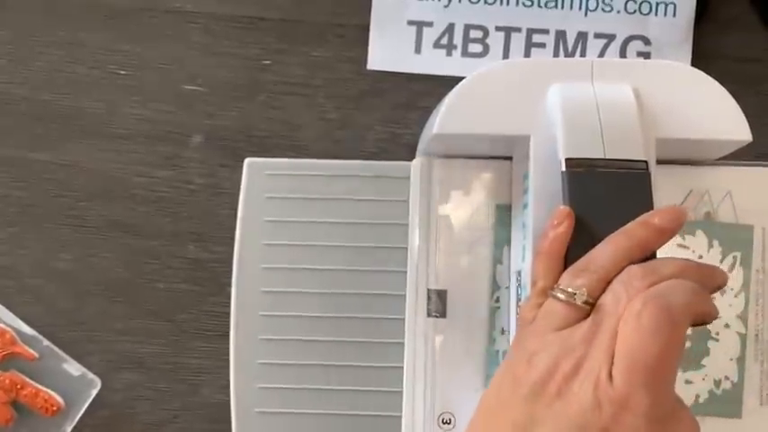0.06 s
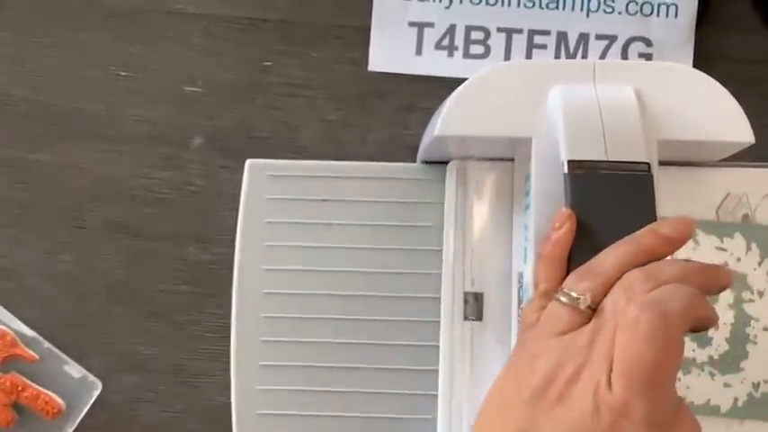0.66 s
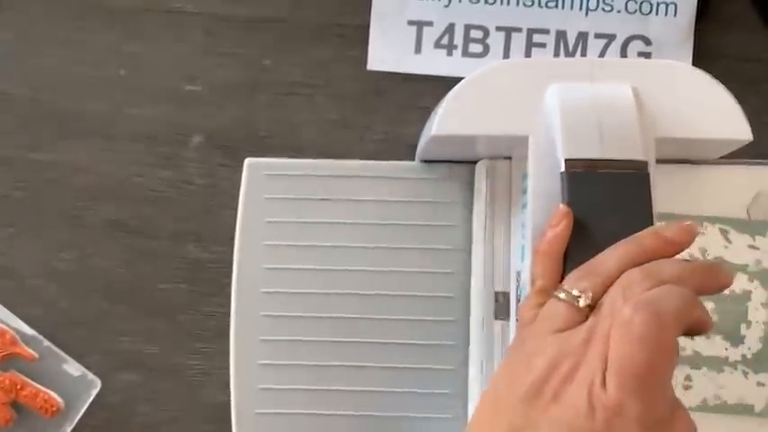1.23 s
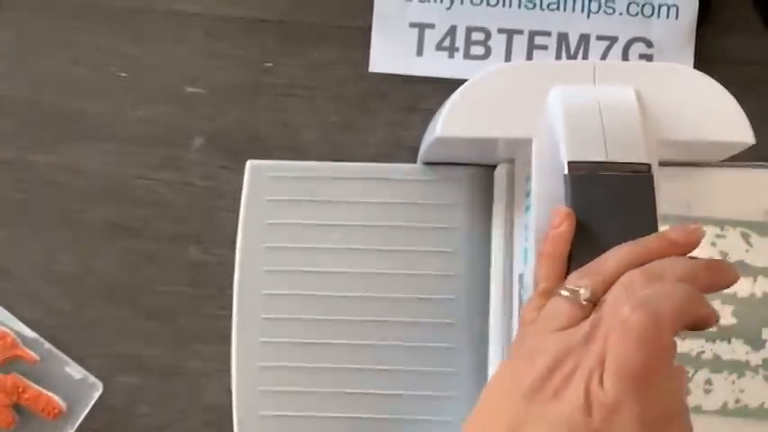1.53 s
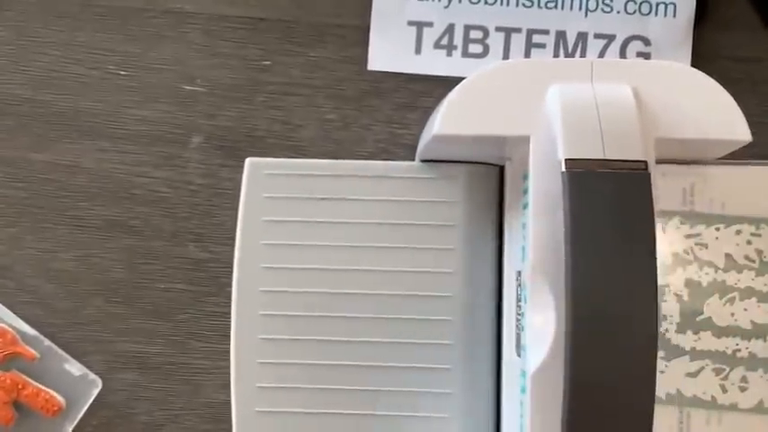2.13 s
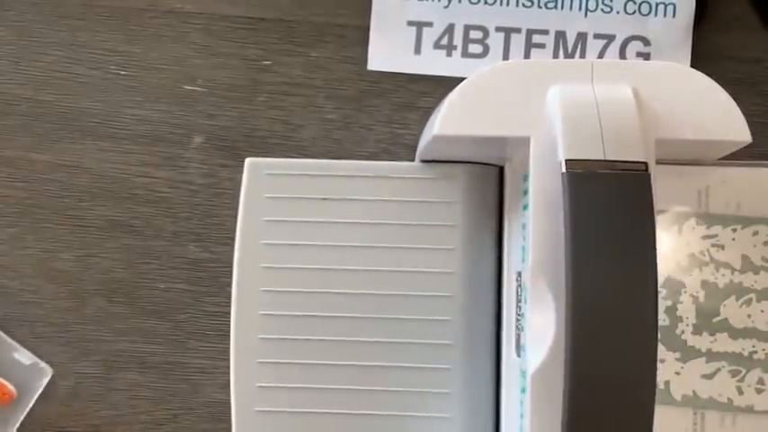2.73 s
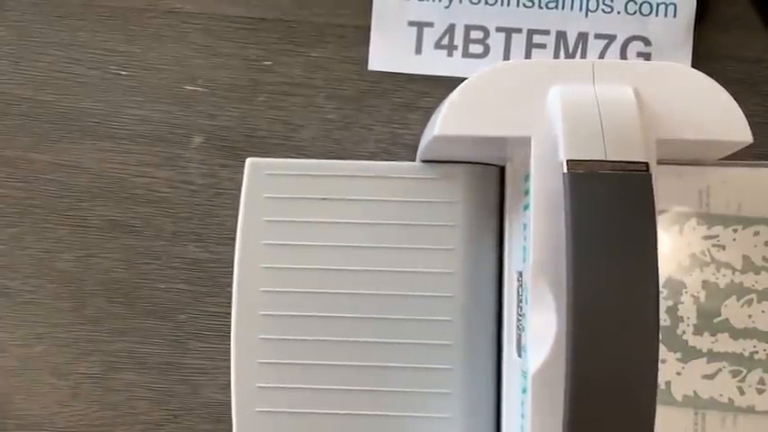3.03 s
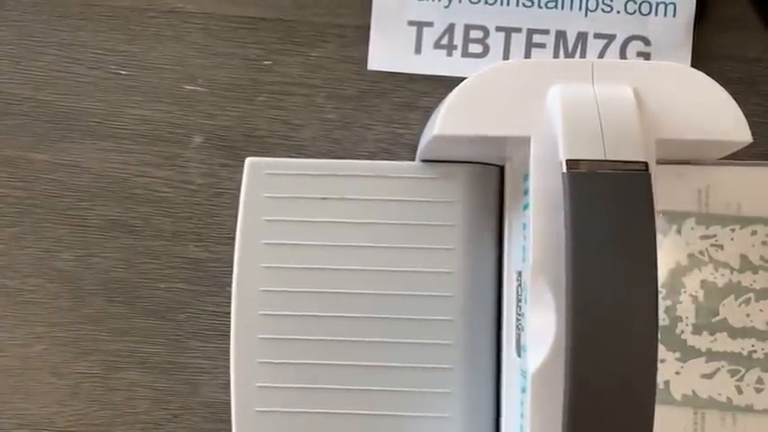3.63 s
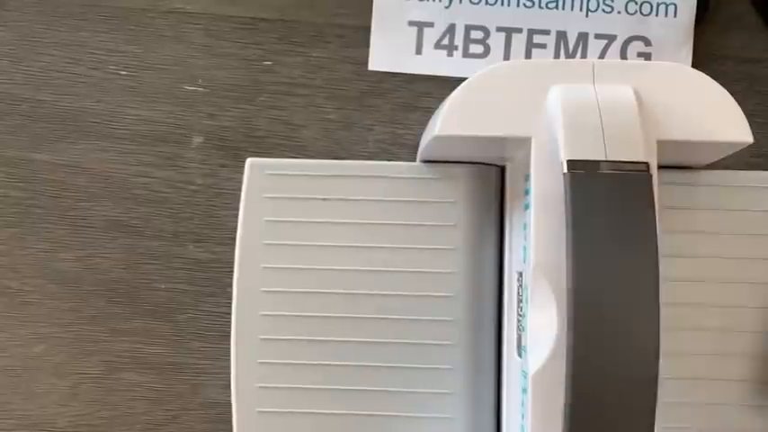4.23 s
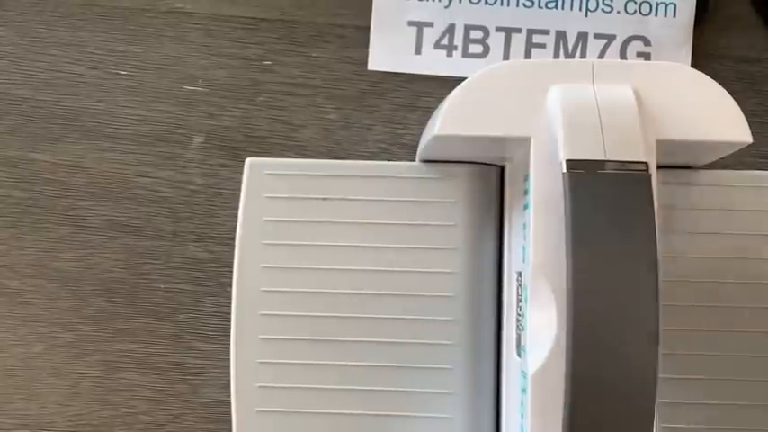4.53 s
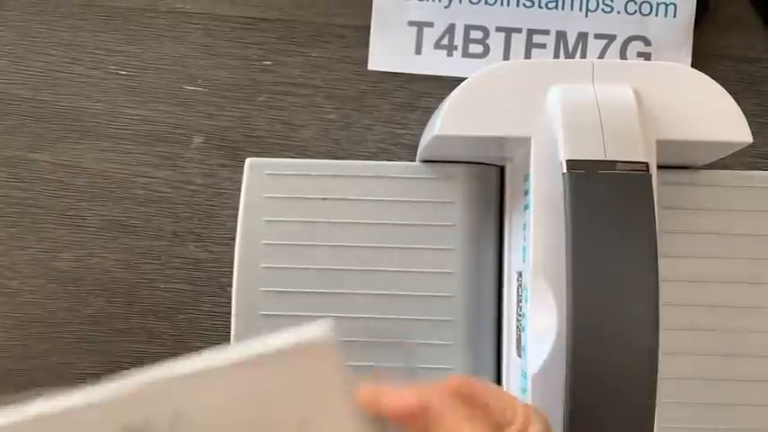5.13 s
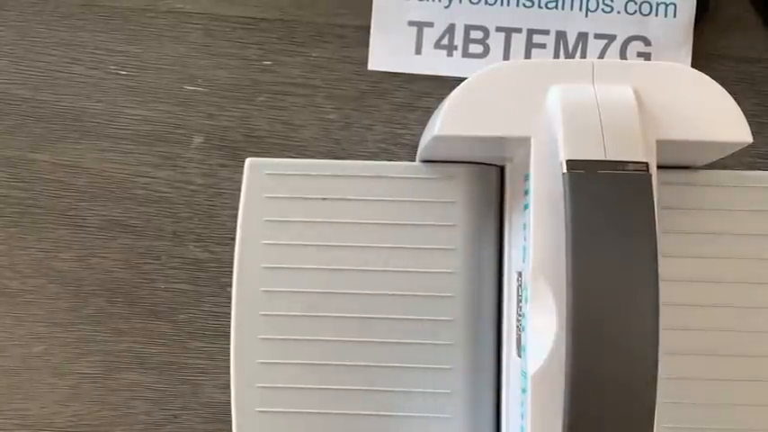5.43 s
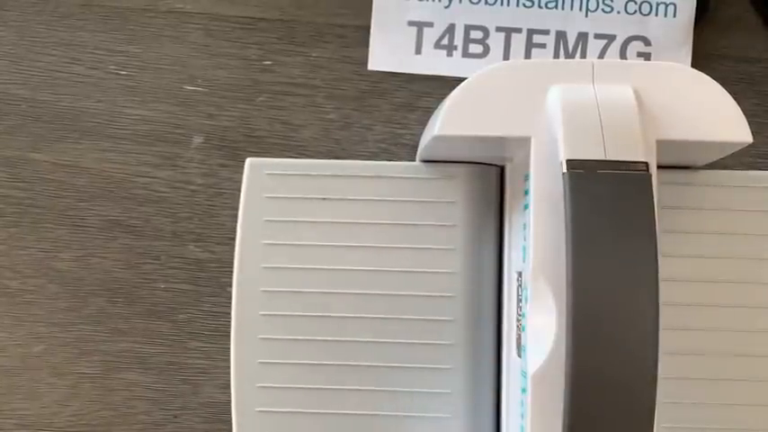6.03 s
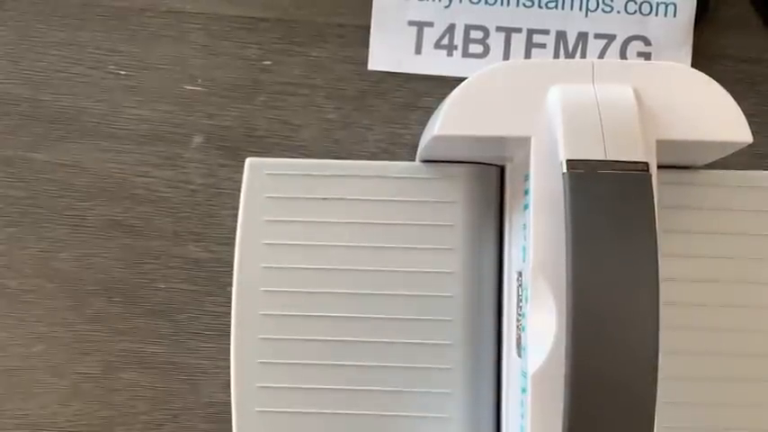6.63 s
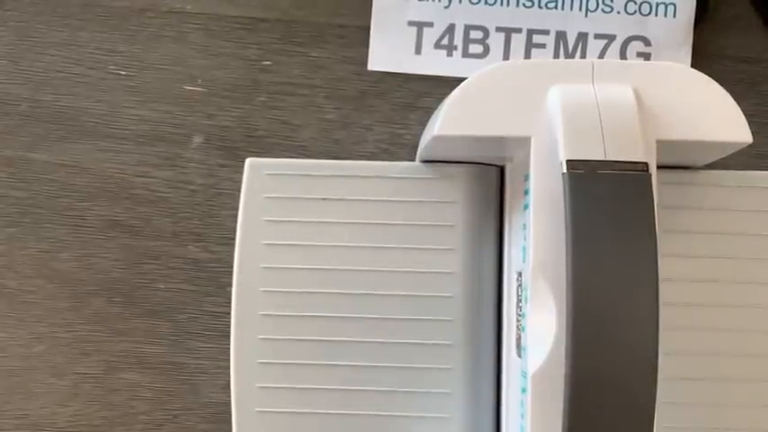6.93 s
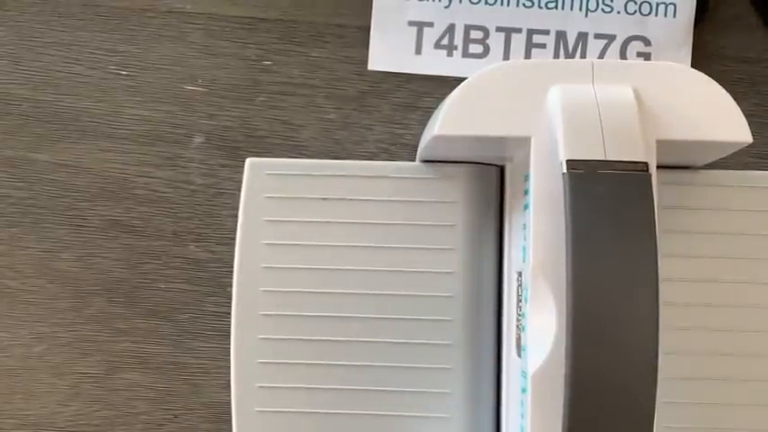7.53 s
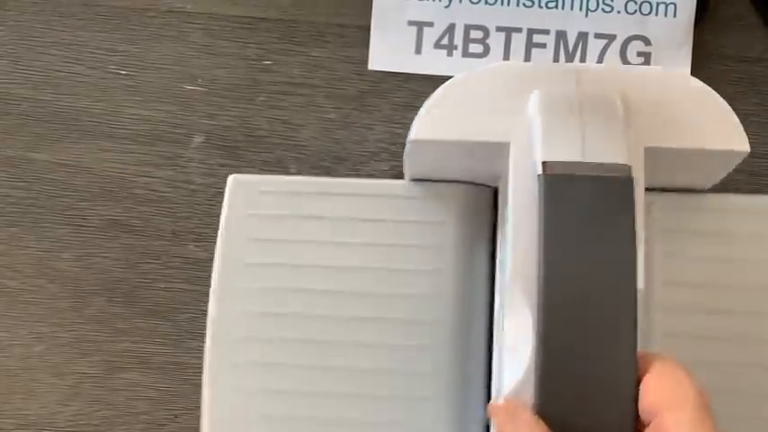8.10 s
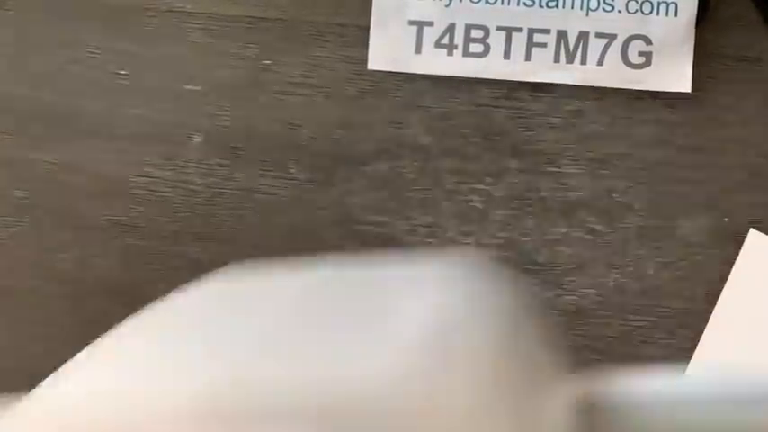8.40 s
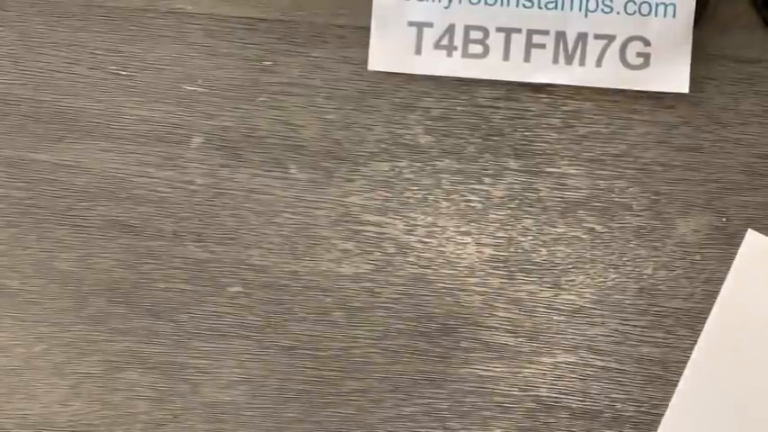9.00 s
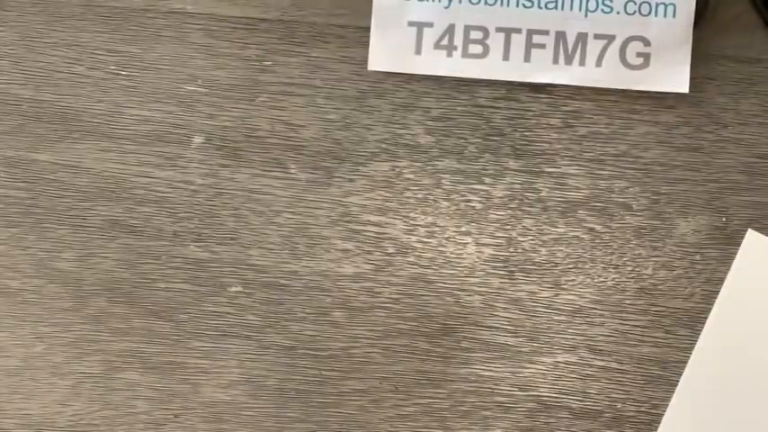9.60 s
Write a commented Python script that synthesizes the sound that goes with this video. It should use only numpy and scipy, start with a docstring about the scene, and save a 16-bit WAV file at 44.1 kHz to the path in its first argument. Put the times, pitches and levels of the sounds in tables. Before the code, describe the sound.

A hand-cranked die-cutting machine rumbles and snaps, then plastic plates clack, rub and squeak before the machine is dragged aside.

```python
"""A craft table in a small room, close to a hand-cranked die-cutting machine.
The rollers rumble and the squeezed plastic plates snap; the die crunches through the card, and the
plates spring free with a thump and are wound back through. They are lifted out, rubbed together and
laid down with clacks and squeaks, then the machine is dragged aside. Hits are noise bursts ringing
in the struck part; rumbles, rubs and drags are stick-slip grains coloured by the part that moves."""
import sys
import numpy as np
from scipy import signal
from scipy.io import wavfile

SR = 44100
rng = np.random.default_rng(int(sys.argv[2]) if len(sys.argv) > 2 else 0)


def wrap_up_sound(samples):
    """Save the sound to the file named by the first command line argument, as 16-bit audio."""
    columns = np.atleast_2d(samples).T
    # keep every value between -1 and 1, then stretch to whole-number steps
    tamed = np.clip(columns, -1, 1)
    steps = np.round(tamed * 32767).astype(np.int16)
    wavfile.write(sys.argv[1], SR, steps)


N = 434826
BAND_LIMIT_HZ = 15950

# Tone curves: frequency_hz, gain_db
AIR_TONE = [(18, -46), (60, -3), (120, -1.5), (237, -15), (332, -11), (620, -16), (2070, -25), (7080, -29),
            (15500, -38.5)]  # the quiet room
ROLLER_TONE = [(20, -31.5), (45, -4.5), (155, 2), (290, -7.5), (360, -1.5), (480, -10), (950, -11),
               (1450, -20.5), (2200, -34.5), (9000, -62.5)]  # rumble of gears and rollers
DRAG_TONE = [(35, -30), (70, -10), (130, -5), (220, -9), (340, -5), (500, -7), (900, -1), (1800, -15),
             (4500, -20), (14000, -53)]  # hard plastic pushed along
RUB_TONE = [(100, -13), (400, -5), (750, -7), (1130, -2), (1500, -4), (2100, -5), (3200, -11), (5000, -17),
            (9000, -36)]  # hollow middle of a rubbed plate
HISS_TONE = [(500, -34), (1800, -12), (3300, -1), (7000, -1), (9500, -10), (15500, -17)]  # gritty top of the same rub
TAP_TONE = [(50, -26), (120, -12), (220, -9), (450, -13), (1150, -4), (2300, -8), (3500, -12), (5500, -14),
            (11000, -30), (15500, -34)]  # plate on plate
THUMP_TONE = [(40, -17), (90, -6), (170, -2), (300, -4), (1000, -3), (1700, -12), (3000, -20), (4500, -23),
              (7000, -31), (10000, -44), (15500, -56)]  # body, crank and table
CRACK_TONE = [(60, -24), (200, -7), (400, -10), (660, -1), (1400, -8), (2400, -3), (3600, -5), (5200, -11),
              (7100, -6), (9600, -7), (15500, -14)]  # plates and die under pressure

# Resonances: pitch_hz, width_hz, lift_db
PLATE_MODES = [(775, 35, 5), (1060, 55, 7), (1240, 55, 6), (2112, 80, 6), (3350, 120, 5), (3820, 90, 4)]  # a loose plate
BODY_MODES = [(160, 26, 5), (218, 40, 5), (394, 30, 7), (465, 30, 4), (1296, 50, 4)]  # the machine's body
DIE_MODES = [(760, 300, 5), (2420, 450, 5.5), (4050, 400, 6), (9720, 560, 9)]  # the thin metal die
SQUEEZED_MODES = [(662, 160, 3), (2410, 300, 3), (7150, 350, 4)]  # plates clamped between the rollers

# The crank turning the rollers, in and then back: start_s, length_s, level_db
CRANK_TURNS = [(0, 1.73, -58), (1.76, 1.025, -59), (2.76, 0.65, -61.5)]
# Plates pushed over the tray, the machine over the table:
# start_s, length_s, level_db, bass_db, tilt_db_per_octave
PUSHES = [(3.497, 0.18, -46.5, 13, -2.5), (3.747, 0.4, -42, 3, -2), (4.19, 0.23, -58.5, 6, -8.5),
          (8.045, 0.11, -59.5, 16, 7), (8.937, 0.14, -63, 1.5, 2), (9.107, 0.26, -59.5, 4.5, -5.5),
          (9.601, 0.18, -56.5, 5, -1.5)]
# A plate or a hand stroking plastic: start_s, length_s, ring_db, hiss_db, hiss_top_hz
STROKES = [(2.628, 0.055, -48, -67, 7700), (2.748, 0.62, -61.5, -72, 7440), (3.088, 0.12, -52, -63, 7500),
           (3.937, 0.029, -37, -44.5, 6140), (4.545, 0.13, -59.5, -76.5, 7400),
           (4.678, 0.077, -50, -57.5, 14200), (4.983, 0.13, -55.5, -70, 15800),
           (5.155, 0.24, -66, -78, 15000), (5.323, 0.06, -54, -66, 15500),
           (5.428, 0.037, -57, -55.5, 15800), (5.494, 0.19, -54, -58, 15600),
           (5.567, 0.069, -65, -46, 15800), (6.341, 0.037, -61, -53.5, 15800),
           (6.511, 0.039, -50.5, -59.5, 10700), (6.55, 0.078, -42, -73, 14200),
           (6.922, 0.23, -61, -70.5, 8200), (7.204, 0.056, -90, -57.5, 9100),
           (7.294, 0.037, -66, -53, 15000), (7.372, 0.12, -81.5, -65.5, 8900),
           (8.034, 0.083, -58.5, -61.5, 9000), (8.576, 0.08, -72, -75, 8300),
           (9.247, 0.069, -61.5, -63, 5740), (9.686, 0.023, -70, -57, 7450)]
# A plate's edge or the machine's foot catching: start_s, length_s, level_db, pitch_hz, width_hz
SCRAPES = [(1.775, 0.053, -59.5, 1240, 604), (1.946, 0.088, -58.5, 380, 348),
           (2.677, 0.092, -55.5, 1630, 603), (2.853, 0.087, -57, 690, 700), (3.306, 0.055, -66, 1160, 900),
           (4.867, 0.2, -64, 1020, 220), (5.082, 0.0071, -41.5, 1126, 260), (6.53, 0.053, -50.5, 1020, 110),
           (7.073, 0.096, -61.5, 1080, 132), (7.71, 0.023, -42.5, 1077, 170),
           (9.011, 0.12, -57.5, 700, 590), (9.66, 0.1, -55, 333, 90)]
# Plate edges squeaking: start_s, pitch_hz, peak_db
SQUEAKS = [(6.279, 4800, -53), (7.298, 5320, -43), (7.693, 2300, -53.5), (7.796, 4840, -57)]
# The die biting through the card just before the plates spring free: start_s, length_s, level_db
DIE_BITE = [(1.193, 0.11, -36.5)]

# Hits: start_s, level_db, bass_db, tilt_db_per_octave, reverb_trim_db, top_hz
TAPS = [(4.267, -60.5, 5, -1, 1, 2830), (4.691, -41.5, 10, -4, -7, 15000),
        (4.753, -55, 18, 1.5, -10, 14000), (4.854, -52.5, 10, 0, -10, 2500),
        (4.956, -64, 12.5, -4, -3, 3530), (5.085, -60.5, -2, 0, -14, 16000),
        (5.322, -53.5, 6, 1, -9, 16000), (5.394, -54.5, 4, -0.5, 1, 16000),
        (5.591, -38.5, -1, -21.5, -2.5, 16000), (5.782, -36, 7.5, -6.5, 12, 5500),
        (6.721, -49, 3, -2.5, -7, 4650), (6.785, -34.5, -1.5, 2, -3, 9900), (6.947, -63, 7, 9.5, -4, 14000),
        (7.037, -70, 22.5, 7, -10, 6560), (7.174, -65, -2, 3, 0, 6520), (7.242, -59, -10, 5.5, -13, 7900),
        (7.405, -67, -14, 8, -7.5, 7500), (7.856, -50.5, -2, 0, 3, 8100)]  # loose plates striking each other
THUMPS = [(1.349, -26.5, 7.5, 5, -8, 16000), (1.502, -47, 5.5, 2.5, -13, 11000),
          (1.548, -52, 8, -0.5, 1, 8970), (2.328, -45, 9, 0, -12, 2200), (2.382, -47, 1.5, 5, 11, 10700),
          (2.642, -57, -3, 10, -1, 7500), (3.163, -53.5, -6, -9, -30, 7500),
          (3.594, -38.5, -5.5, 1, -15, 7240), (3.708, -54, 8, -2, -5, 7000),
          (3.783, -39, -5, -3, -14.5, 7000), (3.829, -39, -8, -3.5, -17, 8000),
          (3.932, -41, -31, 3, -15, 15000), (4.193, -56, 3, 0.5, -3, 6980), (5.785, -35.5, 2, -3, -7, 7500),
          (6.01, -61, 6, 6.5, 9, 4060), (6.214, -43, 2, -1.5, -5.5, 8000), (6.3, -38.5, 4.5, 1.5, 1, 15000),
          (7.712, -45, -9.5, 4, -2.5, 16000), (8.485, -70.5, -11, -10.5, -15, 1990),
          (8.656, -65.5, -2, 5.5, -11, 6000), (9.021, -56.5, -19, -2.5, -21, 5000),
          (9.273, -52.5, -20.5, -6, -11, 6000), (9.694, -50.5, 0, 5.5, 12, 7350),
          (9.782, -51, -9, 1.5, 6, 6900)]  # dull knocks of body, crank and table
CRACKS = [(0.132, -57, 1, -4, 5, 7100), (0.359, -37, -4, 0.5, -4, 15900), (0.504, -53.5, 9, -6, -5, 6400),
          (0.593, -52.5, 7, -11.5, 0, 4500), (0.789, -55.5, 1, -2, 5, 7100),
          (0.926, -53, 4, -0.5, -0.5, 9470), (1.048, -45.5, 7, 0, -3, 16000),
          (1.191, -39.5, 3, 3, -2.5, 16000), (1.2355, -29, 1.5, 1.96, -7, 16000),
          (1.2695, -32.5, 2.5, 2, -7.5, 16460), (1.35, -31.5, -1, -1, 1.5, 15800),
          (1.649, -53, -22, -2, 21, 7400)]  # plates and die snapping under the rollers


def amp(db):
    """Decibels to gain."""
    return 10 ** (np.asarray(db) / 20)


def unit_rms(x):
    """Scales to an rms of one."""
    return x / np.sqrt(np.mean(x ** 2) + 1e-20)


def curve_at(points, hz):
    """Reads a curve on a log-frequency axis."""
    point_hz, value = np.transpose(points)
    return np.interp(np.log(hz + 1), np.log(point_hz + 1), value)


def add(mix, start_s, sound):
    """Lays a sound into the mix at start_s."""
    part = mix[max(round(start_s * SR), 0):][:len(sound)]
    part += sound[:len(part)]


def equalise(x, tone, modes=(), bass_db=0, tilt_db=0, top_hz=SR):
    """Minimum-phase EQ: tone curve, resonances, bass shelf, treble tilt and a drop above top_hz."""
    hz = abs(np.fft.fftfreq(8192, 1 / SR))
    db = curve_at(tone, hz)
    db += sum(lift / (1 + (2 * (hz - pitch) / width) ** 2) for pitch, width, lift in modes)
    db += bass_db * curve_at([(250, 1), (700, 0)], hz)
    db += tilt_db * np.log2(np.clip(hz / 1500, 1, 6))
    db += curve_at([(top_hz, 0), (1.35 * top_hz, -15)], hz)
    log_spectrum = signal.hilbert(np.log(amp(db))).conj()
    kernel = np.fft.ifft(np.exp(log_spectrum)).real
    return signal.fftconvolve(x, kernel[:len(kernel) // 2])[:len(x)]


def room_tail(samples):
    """Diffuse reflections of the small room, each band dying away at its own speed."""
    hz, time_s, bands = signal.stft(rng.standard_normal(samples), SR, nperseg=256)
    t60_s = curve_at([(180, 0.22), (900, 0.25), (7000, 0.24)], hz)
    return signal.istft(bands * amp(-60 * time_s / t60_s[:, None]), SR, nperseg=256)[1][:samples]


def gesture(length_s, attack_s, release_s, arch_db):
    """Envelope of one hand movement: it gets going, presses hardest midway and dies away."""
    t = np.arange(round((length_s + 8 * release_s) * SR)) / SR
    off_centre = (2 * np.minimum(t / length_s, 1) - 1) ** 2
    release = np.exp(-np.maximum(t - length_s, 0) / release_s)
    return amp(-arch_db * off_centre) * np.minimum(t / attack_s, 1) * release


def gestures(rows, attack_s, release_s, arch_db):
    """Envelope of a series of like movements."""
    envelope = np.zeros(N)
    for start_s, length_s, level_db in rows:
        add(envelope, start_s, amp(level_db) * gesture(length_s, attack_s, release_s, arch_db))
    return envelope


def friction(grains_per_s, spread_db, smooth, wet_db, waver_db):
    """Tiny slips of uneven size over a smooth rub, under wavering pressure, heard in the room."""
    sizes = amp(spread_db * np.minimum(rng.exponential(1, N), 4))
    slips = sizes * rng.standard_normal(N) * (rng.random(N) < grains_per_s / SR)
    knots = np.arange(0, N, SR // 25)
    pressure = amp(waver_db * np.interp(np.arange(N), knots, rng.standard_normal(len(knots))))
    rub = (unit_rms(slips) + smooth * rng.standard_normal(N)) * pressure
    tail = room_tail(SR // 2)
    return rub + amp(wet_db) * signal.fftconvolve(rub, tail / np.linalg.norm(tail))[:N]


def sheet_modes(stroke_s, lift_db, lowest_hz=450, count=36):
    """Narrow peaks and dips of thin plastic, new with each grip; a long stroke damps them."""
    freedom = np.exp(-stroke_s / 0.8)
    pitches = lowest_hz * 10 ** ((np.arange(count) + rng.random(count)) / count)
    return [(hz, 24 + hz / 100, lift_db * freedom * rng.uniform(-1, 1)) for hz in pitches]


def glide_down(x, fall_per_s=0.5):
    """Resonances sink as the free end of a sliding plate grows longer."""
    n = np.arange(len(x))
    speed = np.exp(-fall_per_s * (n - len(x) / 4) / SR)
    return np.interp(np.cumsum(speed), n, x)


def resonate(x, centre_hz, width_hz):
    """A steep resonance swept along the curve centre_hz."""
    carrier = np.exp(2j * np.pi * np.cumsum(centre_hz) / SR)
    pole = np.exp(-np.pi * width_hz / SR)
    return (carrier * signal.lfilter([(1 - pole) ** 2], [1, -2 * pole, pole * pole], x / carrier)).real


def hits(rows, tone, modes, rise_s, decay_s, wet_db, echo_db, brush_db, sheet_db=0, detune=0):
    """A brush, a chattering contact, its slap off the table and a room tail ring the struck part."""
    out, t = np.zeros(N), np.arange(SR * 3 // 5) / SR
    impulse = 1.0 * (t == 0)
    tone_gain = np.linalg.norm(equalise(impulse, tone))
    lead_in = t[:SR // 25]
    for start_s, level_db, bass_db, tilt_db, reverb_trim_db, top_hz in rows:
        contact = rng.standard_normal(len(t)) * (1 - np.exp(-(t / rise_s) ** 2)) * np.exp(-t / decay_s)
        echo = amp(echo_db) * np.roll(contact, round(0.0043 * SR))
        tail = amp(wet_db + reverb_trim_db) * room_tail(len(t)) * (1 - np.exp(-t / (2 * rise_s)))
        burst = contact + echo + tail
        # the surfaces graze each other just before they meet
        brush = amp(brush_db) * rng.standard_normal(len(lead_in)) * np.exp(-lead_in[::-1] / 0.006)
        force = np.concatenate([brush, burst / np.std(burst[:SR // 30])])
        # where the hit lands decides how strongly, and at just what pitch, each resonance answers
        struck = [(hz * np.exp(detune * rng.standard_normal()), width, lift * (0.5 + rng.random()))
                  for hz, width, lift in modes]
        struck += sheet_modes(0, sheet_db)
        hit = equalise(force, tone, struck, bass_db, tilt_db, top_hz) / tone_gain
        add(out, start_s - len(lead_in) / SR, amp(level_db) * hit)
    return out


def room_tone(air_db=-75, hum_hz=115.6, hum_db=-82):
    """A bed of quiet air with a faint hum."""
    air = amp(air_db) * unit_rms(equalise(rng.standard_normal(N), AIR_TONE))
    return air + amp(hum_db) * np.sin(2 * np.pi * hum_hz * np.arange(N) / SR)


def roller_rumble():
    """Gears and rollers grind against the plates and shake the body."""
    grind = friction(grains_per_s=160, spread_db=2.5, smooth=0.73, wet_db=0, waver_db=1)
    envelope = gestures(CRANK_TURNS, attack_s=0.005, release_s=0.026, arch_db=3)
    return envelope * unit_rms(equalise(grind, ROLLER_TONE))


def plastic_drags():
    """Coarse stick-slip of hard plastic pushed along, each push with its own boom and brightness."""
    grit = friction(grains_per_s=450, spread_db=2.8, smooth=0.6, wet_db=1, waver_db=0.8)
    out = np.zeros(N)
    for start_s, length_s, level_db, bass_db, tilt_db in PUSHES:
        envelope = amp(level_db) * gesture(length_s, attack_s=0.022, release_s=0.028, arch_db=12)
        grains = grit[round(start_s * SR):][:len(envelope)]
        drag = unit_rms(equalise(grains, DRAG_TONE, (), bass_db, tilt_db))
        add(out, start_s, envelope[:len(drag)] * drag)
    return out


def plate_rubs(grip_detune=0.0926):
    """Smooth plates rub: a hollow ring, retuned a little by each grip, under a fine gritty hiss."""
    rub = friction(grains_per_s=900, spread_db=1.8, smooth=0.5, wet_db=-2, waver_db=2.4)
    out = np.zeros(N)
    for start_s, length_s, ring_db, hiss_db, hiss_top_hz in STROKES:
        envelope = gesture(length_s, attack_s=0.018, release_s=0.03, arch_db=4.5)
        grains = rub[round(start_s * SR):][:len(envelope)]
        shift = np.exp(grip_detune * rng.standard_normal())
        tone = [(hz * shift, db) for hz, db in RUB_TONE]
        modes = [(hz * shift, width, lift * (0.5 + rng.random())) for hz, width, lift in PLATE_MODES]
        modes += sheet_modes(length_s, lift_db=11)
        ring = unit_rms(glide_down(equalise(grains, tone, modes)))
        high_cut = signal.butter(6, min(hiss_top_hz, BAND_LIMIT_HZ), fs=SR, output="sos")
        hiss = unit_rms(signal.sosfilt(high_cut, equalise(grains, HISS_TONE)))
        add(out, start_s, envelope[:len(grains)] * (amp(ring_db) * ring + amp(hiss_db) * hiss))
    return out


def edge_scrapes(sag=0.15):
    """An edge judders over plastic; its resonance sinks by a share of its width as the contact moves."""
    noise = rng.standard_normal(N)
    out = np.zeros(N)
    for start_s, length_s, level_db, pitch_hz, width_hz in SCRAPES:
        envelope = gesture(length_s, attack_s=0.0037, release_s=0.009, arch_db=6.5)
        judder = noise[round(start_s * SR):][:len(envelope)]
        envelope = envelope[:len(judder)]
        travel = np.minimum(np.arange(len(judder)) / SR / length_s, 1)
        ring = resonate(judder, pitch_hz + sag * width_hz * (0.5 - travel), width_hz)
        envelope_rms = np.sqrt(np.mean(envelope ** 2))
        add(out, start_s, amp(level_db) * envelope_rms * unit_rms(envelope * ring))
    return out


def edge_squeaks(length_s=0.007, roughness=0.8):
    """A plate's edge sticks and slips unevenly for an instant, around one high pitch."""
    out, samples = np.zeros(N), round(length_s * SR)
    for start_s, pitch_hz, peak_db in SQUEAKS:
        cycles = np.cumsum(pitch_hz * (1 + roughness * rng.standard_normal(samples))) / SR
        add(out, start_s, amp(peak_db) * np.hanning(samples) * np.sin(2 * np.pi * cycles))
    return out


def plate_taps():
    """Loose plates clack together and ring as thin sheets, with plenty of room."""
    return hits(TAPS, TAP_TONE, PLATE_MODES, rise_s=0.0009, decay_s=0.0065,
                wet_db=6, echo_db=-23, brush_db=-12.5, sheet_db=9)


def body_thumps():
    """Soft-edged knocks wake the low resonances of the machine's body."""
    return hits(THUMPS, THUMP_TONE, BODY_MODES, rise_s=0.0026, decay_s=0.0048,
                wet_db=0, echo_db=-17.5, brush_db=-10.5, sheet_db=7.5)


def die_crunch():
    """A dense run of tiny fractures in the card rings the thin metal die."""
    fractures = friction(grains_per_s=1800, spread_db=2.4, smooth=0.25, wet_db=-1, waver_db=0.5)
    envelope = gestures(DIE_BITE, attack_s=0.004, release_s=0.023, arch_db=2.5)
    return envelope * unit_rms(equalise(fractures, CRACK_TONE, DIE_MODES))


def plate_cracks():
    """Plates and die give under the rollers in tight, bright snaps."""
    return hits(CRACKS, CRACK_TONE, SQUEEZED_MODES, rise_s=0.0017, decay_s=0.0011,
                wet_db=-20, echo_db=-13, brush_db=-21, detune=0.079)


def scene():
    """The mono mix: hits and contact detail over the friction layers and room tone."""
    impacts = plate_cracks() + body_thumps() + plate_taps()
    detail = die_crunch() + edge_scrapes() + edge_squeaks()
    movement = roller_rumble() + plastic_drags() + plate_rubs()
    return (impacts + detail + movement + room_tone())[None]


def record(dry, low_cut_hz=22):
    """A low cut and a steep band limit on the whole mix."""
    low_cut = signal.butter(2, low_cut_hz, "high", fs=SR, output="sos")
    band_limit = signal.firwin(255, BAND_LIMIT_HZ, window=("kaiser", 7), fs=SR)
    return signal.oaconvolve(signal.sosfilt(low_cut, dry), band_limit[None], "same")


dry = scene()
out = record(dry)
wrap_up_sound(out)
```